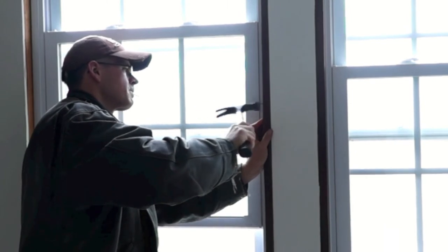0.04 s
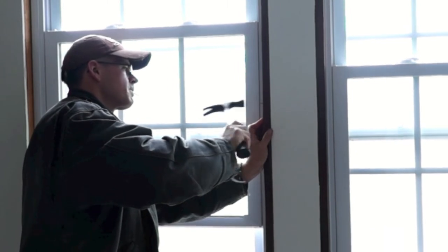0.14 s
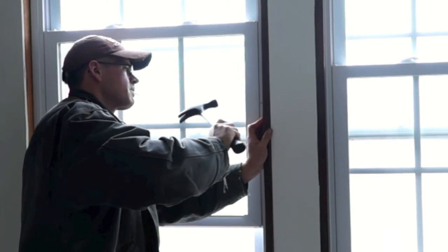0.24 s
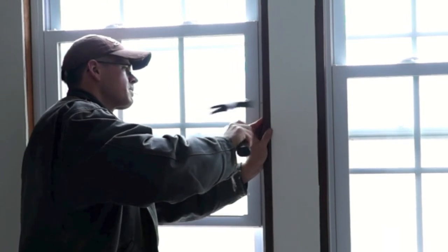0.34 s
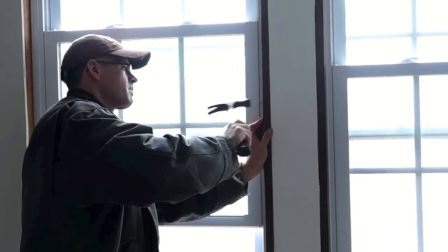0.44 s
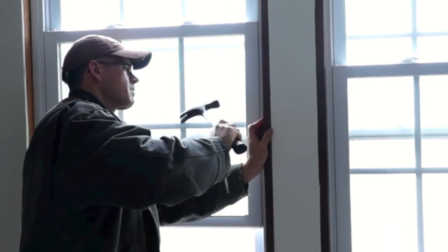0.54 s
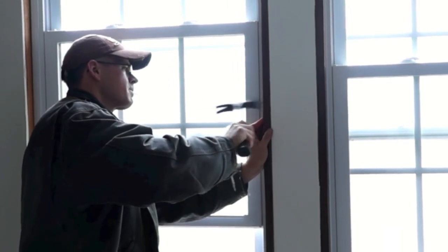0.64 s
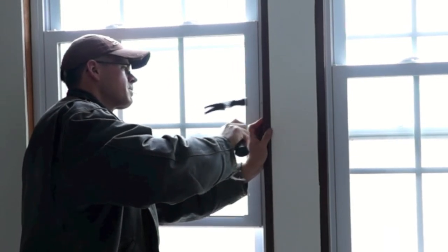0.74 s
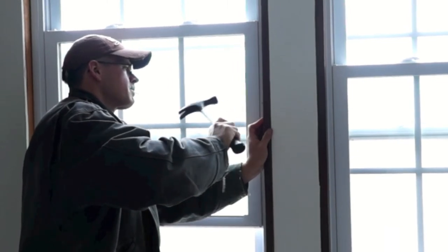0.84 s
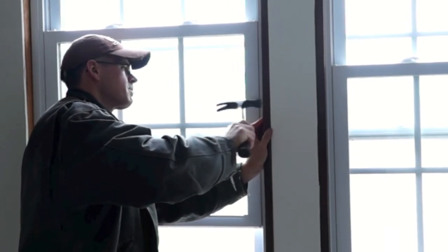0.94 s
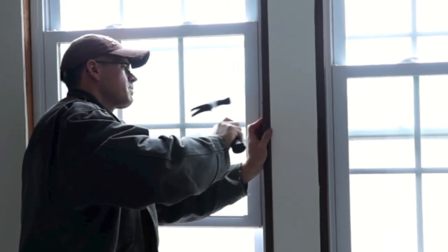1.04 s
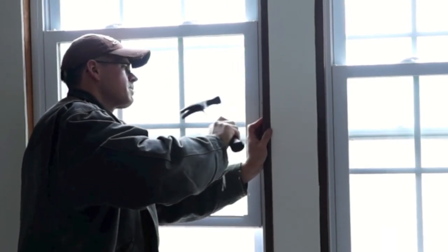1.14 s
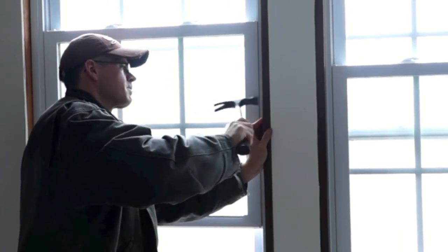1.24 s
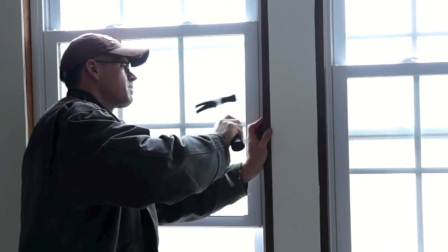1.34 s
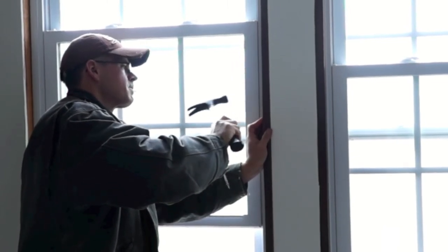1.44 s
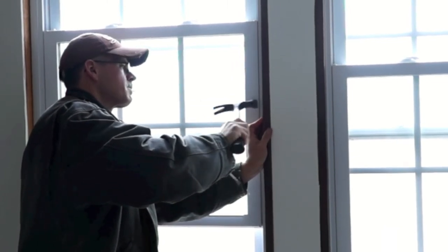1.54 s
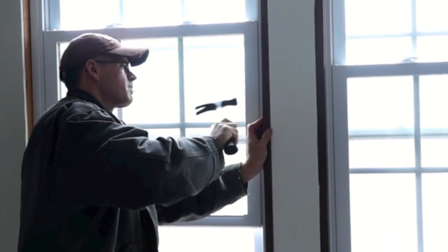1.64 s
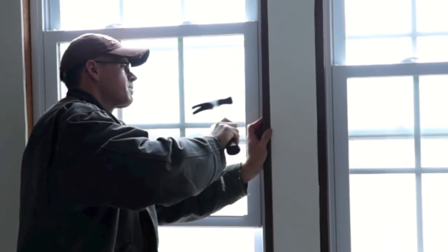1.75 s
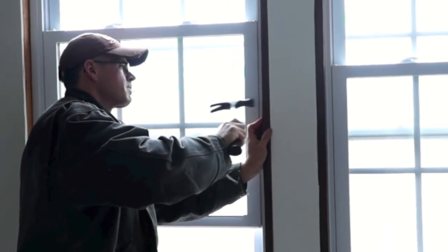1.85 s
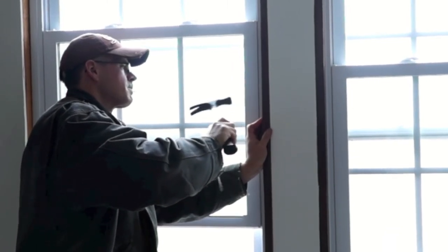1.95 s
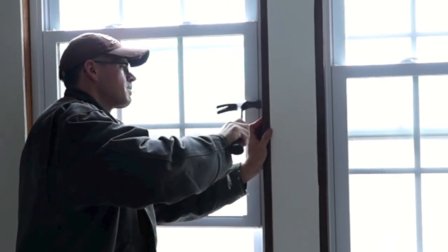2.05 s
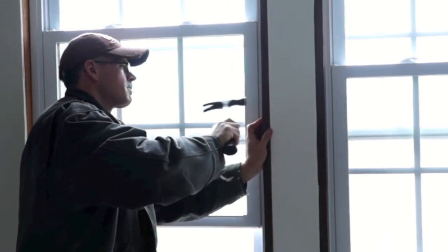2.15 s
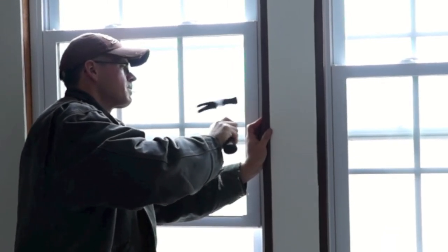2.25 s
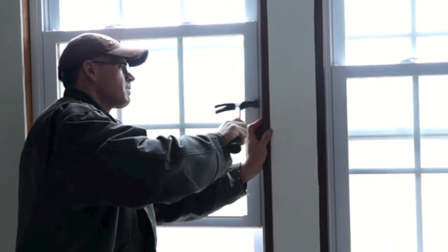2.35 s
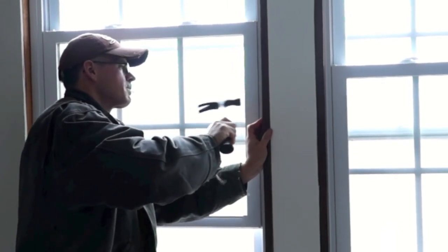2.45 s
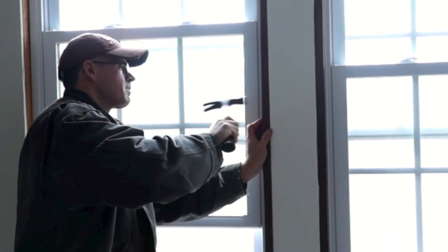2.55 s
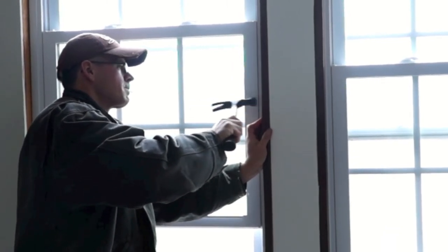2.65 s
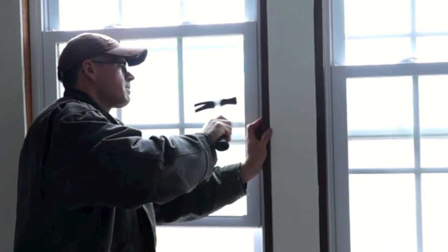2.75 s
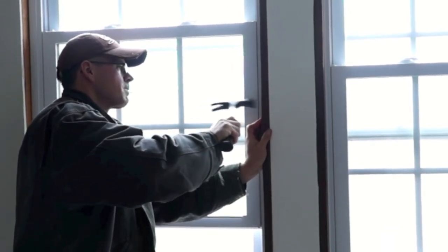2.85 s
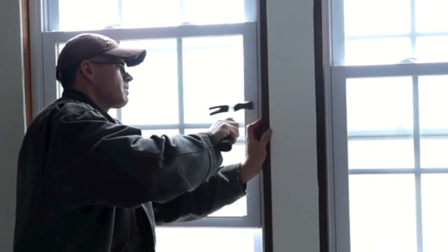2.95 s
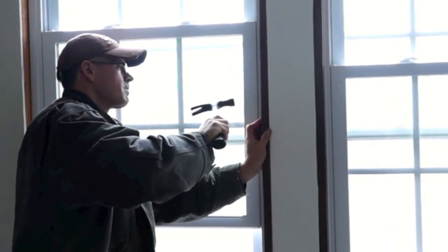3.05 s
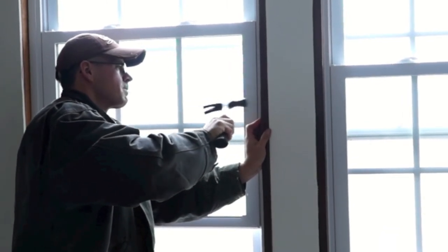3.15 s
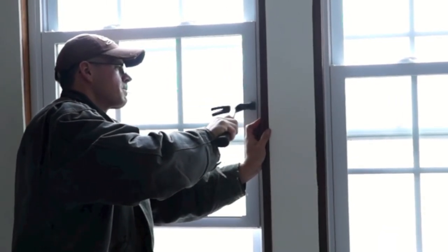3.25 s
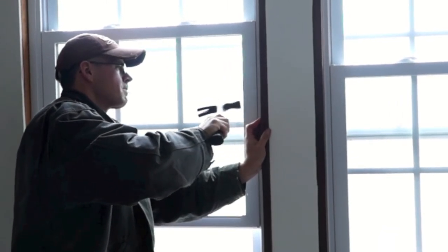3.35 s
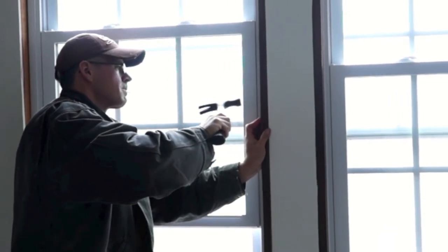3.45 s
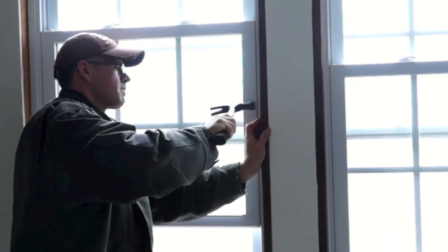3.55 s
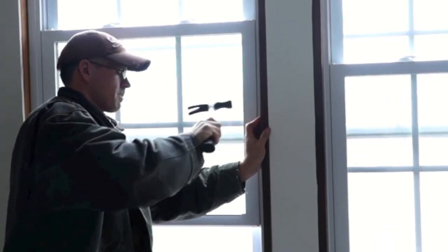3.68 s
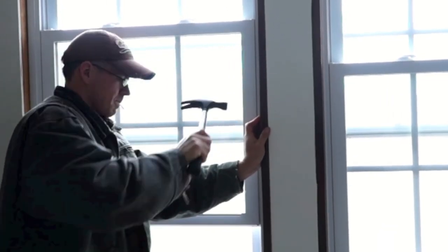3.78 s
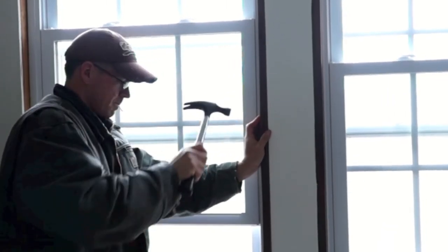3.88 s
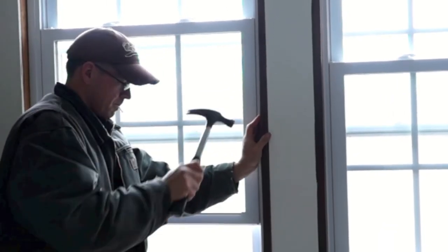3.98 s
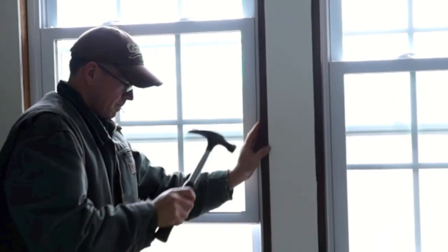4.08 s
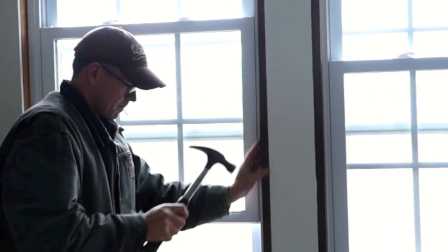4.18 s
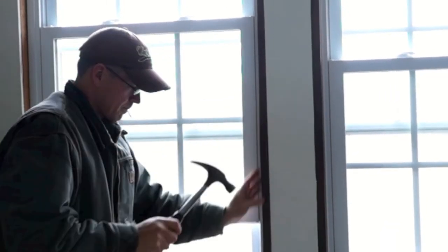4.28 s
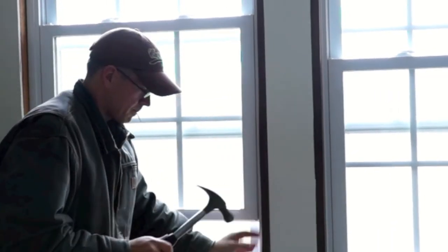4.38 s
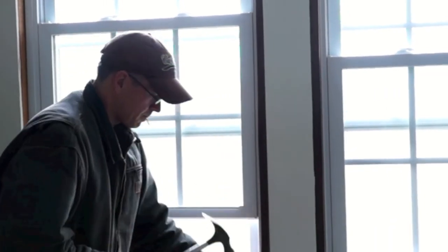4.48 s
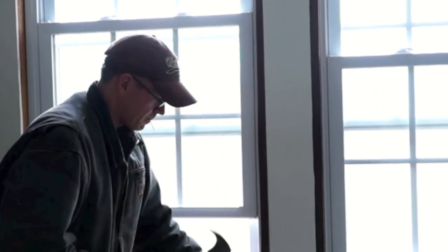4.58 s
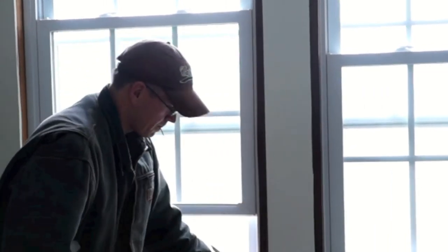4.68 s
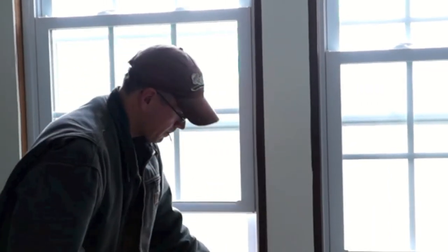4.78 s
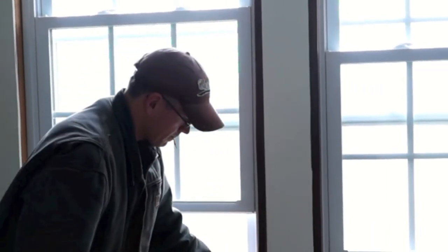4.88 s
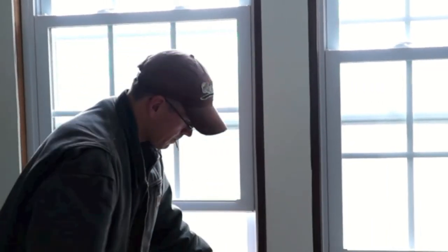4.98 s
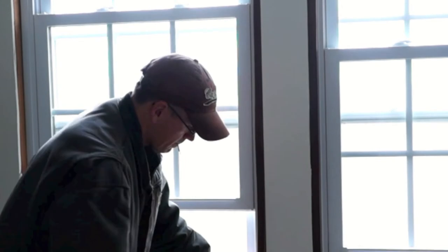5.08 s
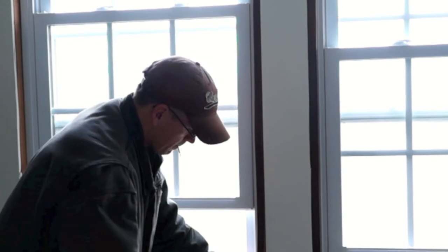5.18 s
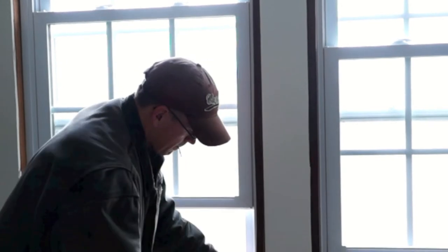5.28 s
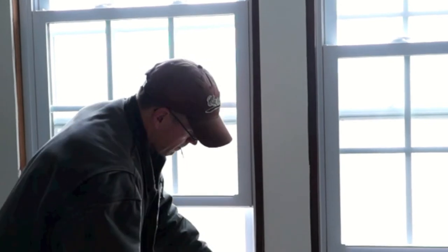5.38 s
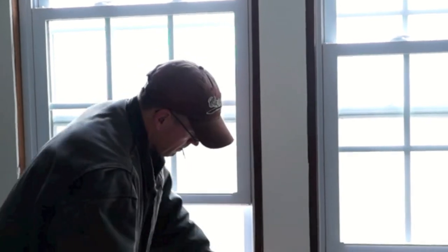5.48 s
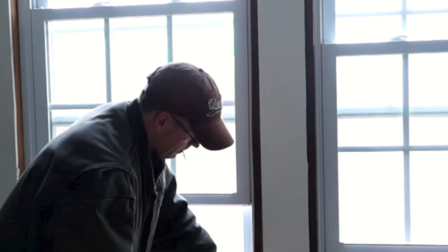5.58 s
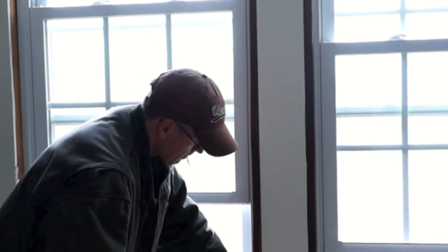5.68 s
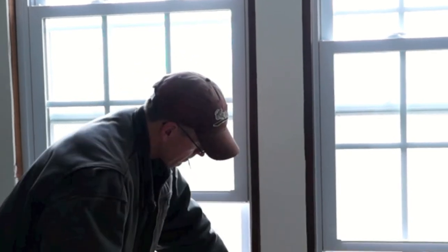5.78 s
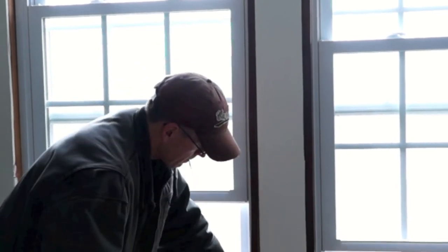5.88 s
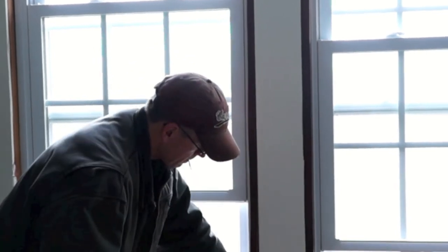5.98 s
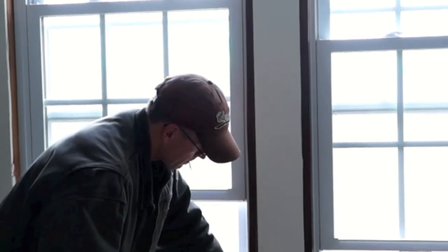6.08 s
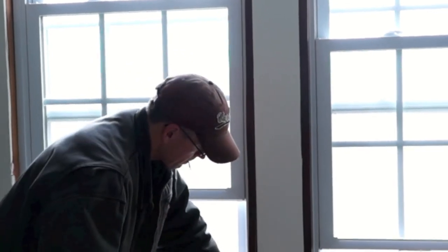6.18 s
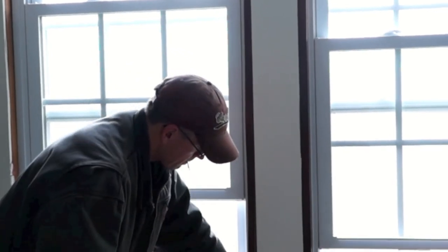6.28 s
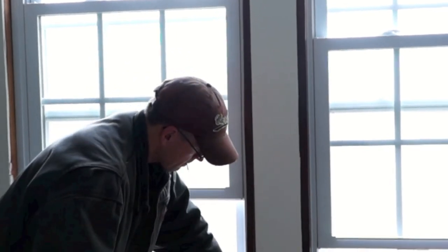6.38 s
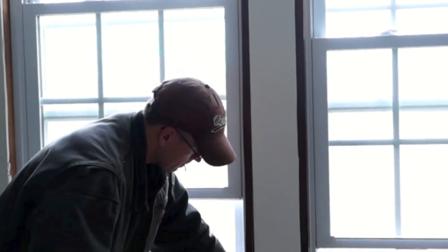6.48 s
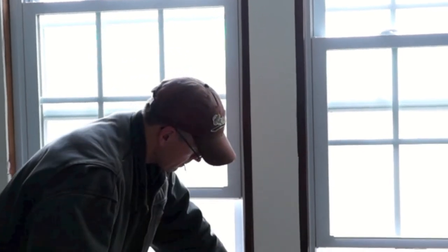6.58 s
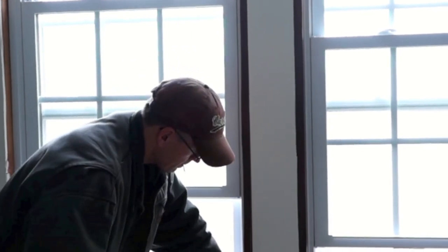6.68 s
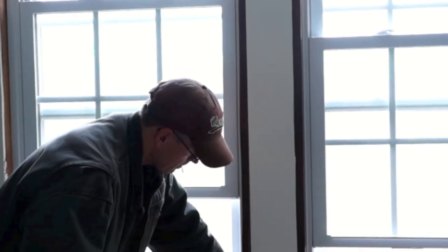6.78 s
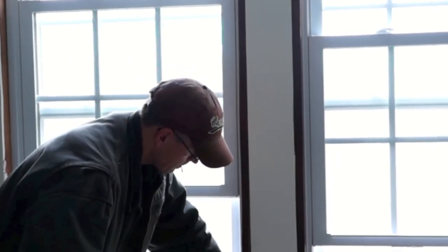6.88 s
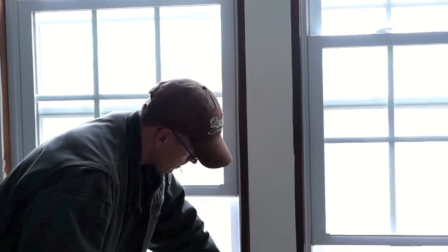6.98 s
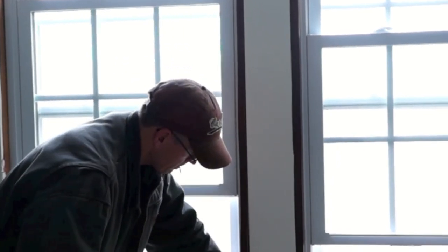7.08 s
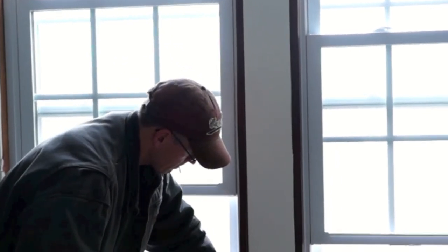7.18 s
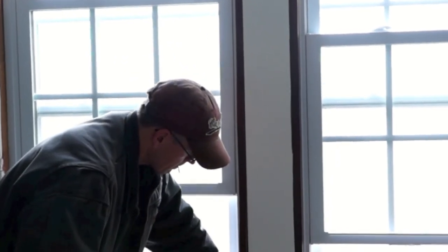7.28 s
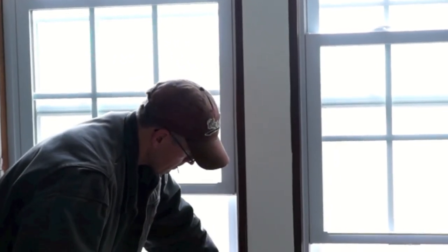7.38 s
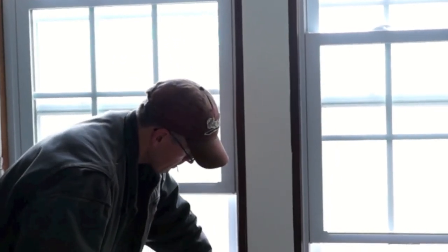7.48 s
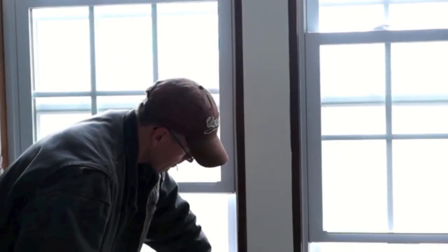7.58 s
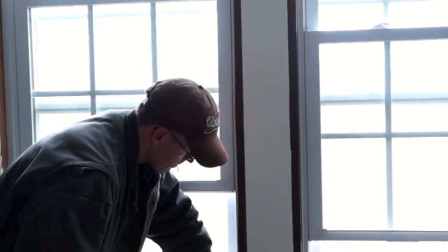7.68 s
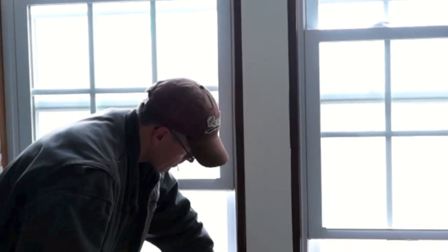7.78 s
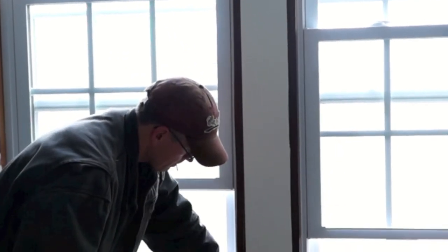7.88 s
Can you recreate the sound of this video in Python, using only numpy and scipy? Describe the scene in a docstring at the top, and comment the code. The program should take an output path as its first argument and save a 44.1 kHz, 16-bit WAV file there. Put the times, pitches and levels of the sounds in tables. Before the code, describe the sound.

Steel strikes a nail in wooden trim at a steady pace, three or four blows a second, climbing in pitch and then dulling as the hammer meets wood. The hammering stops, the handle knocks softly and heavy cloth rustles faintly. Eight gentler taps then shake the wall with low thuds while a loose board clacks back. Everything is heard from nearby in a quiet, bare room with a brief echo.

```python
"""A bare room, where a man drives a nail into wooden window trim with a steady run of hammer blows.
The nail's note climbs as it sinks, the hollow wall booms, and the last blows land on the wood itself.
He shifts his grip, bends down with a rustle of his jacket and softly taps the lower trim into place;
the loose board clacks back. Each knock is a short burst of noise plus the room's echo, shaped by the
tones the wood favours. A faint hush lies under it all."""
import sys
import numpy as np
from scipy import signal
from scipy.fft import rfft, irfft
from scipy.io import wavfile
from scipy.ndimage import uniform_filter1d

SR = 44100
rng = np.random.default_rng(int(sys.argv[2]) if len(sys.argv) > 2 else 0)


def generate_wav(signal):
    """Clip the signal to [-1, 1] and save it as 16-bit WAV at the path in sys.argv[1]."""
    frames = np.transpose(np.atleast_2d(signal))
    scaled = np.clip(frames, -1, 1) * 32767
    pcm = np.round(scaled).astype(np.int16)
    wavfile.write(sys.argv[1], SR, pcm)


N = 349713
SIZE = 24576  # samples in one knock and its echo
HZ, AGE = np.fft.rfftfreq(SIZE, 1 / SR), np.arange(SIZE) / SR  # its frequencies, its time in seconds

# How long the room echoes. Each row: frequency in Hz, base time in seconds to fade by 60 dB.
ROOM_FADE = [(60, 0.71), (200, 0.38), (500, 0.3), (1000, 0.37), (2000, 0.28), (5000, 0.26), (9000, 0.26),
             (16000, 0.16)]
# Tones the lower trim favours. Each row: frequency in Hz, width in octaves, boost in dB.
LOWER_BOARD = [(550, 0.063, 7), (1394, 0.04, 4.5), (1650, 0.018, 7), (2350, 0.03, 2.5), (4800, 0.04, 4)]


def hammer(steel_hz=16500, change_hz=7000, push_db=-3.5):
    """Blows shake nail, board and wall; the harder the contact, the more the wall booms."""
    # Each row: start in seconds, force in dB, treble limit in Hz (high on steel, low on wood).
    blows = [(-0.2, -7.5, 16000), (0.0932, -5, 16500), (0.4015, -5, 18200), (0.684, -5, 17400),
             (0.9683, -5, 16200), (1.2574, -5, 14000), (1.5452, -5.5, 13100), (1.823, -5.5, 13000),
             (2.0849, -5.5, 13000), (2.3528, -6, 13100), (2.6373, -5, 11700), (2.911, -5, 6570),
             (3.2462, -6, 2930), (3.5322, -5.5, 9300)]
    # The tone of a blow on the trim. Each row: frequency in Hz, level in dB.
    trim_tone = [(30, -8.5), (55, 18), (78, 28), (140, 22.5), (270, 32.5), (450, 30), (850, 25),
                 (1200, 17.5), (1850, 20.5), (2600, 13), (3900, 7.5), (5500, 13), (8500, 13.5),
                 (12000, 6.5), (16000, 0)]
    # Tones the nailed board favours. Each row: frequency in Hz, width in octaves, gain in dB.
    board = [(471, 0.026, 2.5), (534, 0.11, 0), (642, 0.068, 2.5), (890, 0.1, 1.5), (1050, 0.03, -0.5),
             (1307, 0.02, 6), (1730, 0.035, 2), (2470, 0.068, 3), (3490, 0.025, 2), (6550, 0.16, -3)]
    trim_db = read(trim_tone, HZ) + resonances(board)
    # the hammer never lands twice on quite the same spot, which changes the treble most
    fresh_share = np.clip(0.082 + 1.4 * HZ / (HZ + change_hz), .01, .99)
    boom, out = wall_boom(), np.zeros((2, N))
    steady = coloured(impact(), trim_db + 10 * np.log10(1 - fresh_share)) + woodwork_ring()
    push = coloured(board_push(), trim_db + push_db)
    for s, force_db, top_hz in blows:
        fresh = coloured(impact(), trim_db + 10 * np.log10(fresh_share))
        softness = np.log2(steel_hz / top_hz)
        boom_db = -0.93 - 3 * softness
        wall_db = 0.87 * boom_db * bell(HZ, 180, 1.0)
        # a softer contact puts its force into the middle tones
        contact_db = np.maximum(soft_contact(top_hz), -19) + 0.32 * softness * bell(HZ, 1116, 1.2)
        blow = coloured(steady + fresh + push, nail_colour(s) + wall_db + contact_db)
        add(out, s, amp(force_db) * (blow + amp(boom_db) * boom))
    return leaning(out)


def impact(click_db=-9, crack_db=-8):
    """The click of steel on the nail, the crack of the wood round it, then the room."""
    click = amp(click_db) * crack(decay_s=0.0004, low_hz=2310)
    wood = amp(crack_db) * crack(decay_s=0.0037, low_hz=420)
    return click + wood + room()


def nail_colour(s, free_hz=677, sunk_hz=1254, ping_hz=3450, ping_life_s=0.17):
    """The nail's note climbs and weakens as it sinks: dB over HZ for a blow at time s."""
    # The nail holds, then sinks. Each row: time in seconds, depth from 0 (free) to 1 (fully in).
    sinking = [(0.7, 0), (1.25, 0.13), (1.55, 0.42), (2.35, 0.57), (3.2, 1)]
    depth = np.interp(s, *np.transpose(sinking))
    note_hz = free_hz * (sunk_hz / free_hz) ** depth
    # the nail passes its own note and absorbs the band below it
    note = 1.3 * bell(HZ, note_hz, 0.13) - 1.35 * bell(HZ, 0.618 * note_hz, 0.13)
    # the loose nail pings until the wood grips it
    ping_db = 8 * np.exp(-max(s, 0) / ping_life_s) * bell(HZ, ping_hz, 0.28)
    # the deeper the nail, the more the wood knocks and snaps
    knock_db = np.interp(depth, [0, 1], [-6, 1.5]) * bell(HZ, 520, 0.69)
    snap_db = np.interp(depth, [0, 1], [0.87, 1.6]) * bell(HZ, 3500, 0.91)
    return np.interp(depth, [0, 1], [6, 2]) * note + ping_db + knock_db + snap_db


def board_push(delay_s=.0013):
    """Just after the steel clicks, the whole board gives way in one push."""
    pulse = coloured(-signal.unit_impulse(SIZE, round(delay_s * SR)), soft_contact(3200))
    return signal.lfilter(*signal.butter(2, 560, "high", fs=SR), pulse)


def woodwork_ring(rise_cycles=2.7, apart_radians=0.34, life=0.92):
    """Trim, window and wall ring with tones that build up, slightly out of step left and right."""
    # Each row: frequency in Hz, level in dB, base time in seconds to fade by 60 dB.
    tones = [(178, -32, .4), (207, -31, .35), (231, -29, .45), (283, -24, .33), (298, -26, .3),
             (326, -27, .3), (374, -28, .3), (451, -27, .33), (520, -28, .3), (543, -27, .35),
             (630, -26, .35), (661, -28, .35), (694, -29, .5), (768, -28, .3), (811, -26, .35),
             (850, -28, .3), (879, -26, .3), (939, -28, .3), (1005, -25, .3), (1345, -29, .25),
             (1673, -26, .23), (1728, -30, .22), (1936, -27, .22), (2213, -31, .18), (2342, -32, .2),
             (2546, -32, .2), (3020, -35, .16), (3440, -34, .12), (3494, -37, .22)]
    hz, db, fade_s = np.transpose(tones)[:, :, None]
    phase = 2 * np.pi * rng.random((len(tones), 1))
    skew = apart_radians * rng.choice([-.5, .5], (len(tones), 1))
    level = amp(db - 60 * AGE / (life * fade_s)) * (1 - np.exp(-AGE * hz / rise_cycles))
    angle = 2 * np.pi * hz * AGE + phase
    return np.array([(level * np.sin(angle + side * skew)).sum(0) for side in (-1, 1)])


def wall_boom(hz=94, db=-22.5, peak_s=0.069, swell=7.5, linger_db=-9):
    """The hollow wall swells into a low note that lingers in the room, louder on the right."""
    progress = AGE / peak_s
    linger = np.minimum(progress, 1) ** 2 * amp(-60 * (AGE - peak_s) / read(ROOM_FADE, hz))
    level = (progress * np.exp(1 - progress)) ** swell + amp(linger_db) * linger
    return amp(db) * level * np.sin(2 * np.pi * hz * AGE) * amp([[-2.8], [-.8]])


def taps(direct_db=-9, rumble_db=6, rumble_top_hz=76):
    """Soft knocks on the lower trim shake the wall; the board hums and the floor rumbles on."""
    # Each row: start in seconds, force in dB, extra deep thud in dB.
    knocks = [(5.792, -3, 2), (6.044, -3.5, 3), (6.322, -6.5, 9.5), (6.572, -6.5, 7.5), (6.818, -5.5, 7),
              (7.064, 0.5, 4.5), (7.329, -2, 8), (7.899, 4.5, 7.5)]
    # The tone of a tap. Each row: frequency in Hz, level in dB.
    tap_tone = [(25, 10), (45, 20), (110, 8), (170, 9), (280, 10), (400, -3), (900, -5.5), (1800, -12),
                (4000, -19.5), (16000, -1.5)]
    out, fade = np.zeros((2, N)), signal.windows.tukey(SIZE, .05)
    tap_db = read(tap_tone, HZ) + resonances(LOWER_BOARD)
    boom = wall_boom(hz=110.8, db=-37.5, peak_s=0.036, swell=3.6, linger_db=-19)
    for s, db, thud_db in knocks:
        add(out, s, amp(db + thud_db / 2) * boom)
        top_hz = 3050 * 2 ** (db / 23)  # a firmer tap is brighter
        knock = room(life=0.59) + amp(direct_db) * crack(decay_s=0.0038, low_hz=292)
        add(out, s, coloured(knock, db + tap_db + soft_contact(top_hz) + thud_db * bell(HZ, 42, 1.4)))
        rumble = coloured(room(life=2.0), db + thud_db + rumble_db + soft_contact(rumble_top_hz))
        add(out, s, fade * rumble)
    return out


def clacks():
    """The loose board clacks against the frame, wood on wood."""
    # Each row: start in seconds, level in dB.
    hits = [(5.7919, -6), (6.366, -7), (6.602, -15), (6.8449, -11.5), (7.0665, -9), (7.0864, -8),
            (7.3524, -9), (7.898, -13), (7.9225, -8)]
    # The tone of a clack. Each row: frequency in Hz, level in dB.
    clack_tone = [(100, -9), (550, 0.5), (1000, -1.5), (1500, -5.5), (2000, -4), (3000, -13.5),
                  (5000, -15.5), (8000, -12), (12000, -23.5), (16000, -31)]
    out = np.zeros((2, N))
    for s, db in hits:
        click = 0.83 * crack(decay_s=0.00076, low_hz=590) + 0.87 * room()
        add(out, s, coloured(click, db + read(clack_tone, HZ) + resonances(LOWER_BOARD)))
    return out


def handle_bumps():
    """Hand and handle knock dully as he shifts his grip and lowers the hammer."""
    # Each row: start in seconds, level in dB, centre frequency in Hz.
    knocks = [(3.885, -14, 516), (4.066, -21, 1100), (4.195, -17.5, 800), (4.326, -11.5, 726),
              (4.457, -18.5, 883), (4.462, -10, 253), (4.63, -22, 1096)]
    out = np.zeros((2, N))
    for s, db, hz in knocks:
        knock = room(life=0.35) + .5 * crack(decay_s=0.0029, low_hz=198)
        add(out, s, coloured(knock, db + 20 * np.log10(bell(HZ, hz, 0.5) + 0.017)))
    return out


def scuffs(grain_db=4.0, octaves=0.72):
    """Sleeve and wood rub in brief grainy swells, heard through the room's echo."""
    # Each row: rough time of the peak in seconds, level in dB, half length in seconds, centre in Hz.
    rubs = [(3.899, -70, 0.032, 5500), (4.319, -61, 0.04, 895), (4.325, -68, 0.079, 8000),
            (5.31, -60, 0.017, 1950), (6.66, -68.5, 0.16, 5730), (7.169, -50.5, 0.01, 720),
            (7.153, -54, 0.014, 4430), (7.429, -52, 0.0052, 4660), (7.434, -47.5, 0.0082, 610)]
    out, middle = np.zeros((2, N)), AGE[SIZE // 2]
    for s, db, half_s, hz in rubs:
        grains = rng.standard_normal(SIZE) * amp(grain_db * rng.exponential(1, SIZE))
        rub = coloured(grains, 20 * np.log10(bell(HZ, hz, octaves) + .01))
        swell = amp(db) * np.exp(-.5 * ((AGE - middle) / half_s) ** 2)
        add(out, s - middle - .015, signal.fftconvolve(swell * rub / rub.std(), room(), axes=1))
    return out


def jacket(folds_db=2.0):
    """Heavy cloth slides over itself as he stoops, catching fold by fold."""
    # How loud the rubbing is. Each row: time in seconds, level in dB.
    stoop = [(3.7, -76.5), (4.2, -70), (4.6, -82), (4.9, -74.5), (5.15, -64.5), (5.32, -61.5), (5.42, -70),
             (7.9, -68)]
    # The tone of the cloth. Each row: frequency in Hz, relative level in dB.
    cloth_tone = [(100, -23), (300, -10), (1100, -10), (2200, -13), (3800, -19.5), (7000, -15),
                  (10000, -16.5), (16000, -24)]
    t = np.arange(N) / SR
    fold_times = np.linspace(0, t[-1], num=240)
    folds = np.interp(t, fold_times, rng.standard_normal(len(fold_times)))
    return hiss(cloth_tone) * amp(np.interp(t, *np.transpose(stoop)) + folds_db * folds)


def room(life=0.84):
    """Echoes off the bare walls build up and die away band by band; life scales how long they last."""
    # Each row: frequency in Hz, seconds the echo takes to build up.
    build_up = [(60, 0.0034), (180, 0.009), (400, 0.014), (1000, 0.005), (8000, 0.00083)]
    hz, t, noise = signal.stft(rng.standard_normal((2, SIZE)), SR, nperseg=256)
    rise = (1 - np.exp(-t / read(build_up, hz)[:, None])) ** 2
    fall = amp(-60 * t / (life * read(ROOM_FADE, hz)[:, None]))
    tails = signal.istft(noise * rise * fall, SR, nperseg=256)[1][:, :SIZE]
    return spread(*[levelled(tail, span_hz=37.06) for tail in tails])


def air(db=-65.5):
    """The steady hush of the still room."""
    # Each row: frequency in Hz, relative level in dB.
    air_tone = [(25, 6), (50, -1.5), (110, 3), (180, 1), (280, 5.5), (400, -1.5), (700, -3.5), (1500, -8),
                (2400, -11.5), (6000, -13.5), (11000, -12.5), (16000, -20)]
    return amp(db) * hiss(air_tone)


def crack(decay_s, low_hz):
    """The sound straight from a knock: a very short burst of noise with little bass."""
    bursts = rng.standard_normal((2, SIZE)) * np.exp(-AGE / decay_s)
    direct = spread(*[levelled(burst, span_hz=524) for burst in bursts])
    return signal.lfilter(*signal.butter(2, low_hz, "high", fs=SR), direct)


def hiss(tone):
    """Wide stereo noise with the given tone; its middle signal has level 1."""
    # Stereo width. Each row: frequency in Hz, side level over middle level in dB.
    width = [(60, -19), (300, -1), (1000, 5), (4000, -0.5), (15000, -2.5)]
    hz = np.fft.rfftfreq(N, 1 / SR)
    spectra = rfft(rng.standard_normal((2, N))) * amp(read(tone, hz))
    mid, side = irfft(spectra[0], N), irfft(spectra[1] * amp(read(width, hz)), N)
    return np.array([mid + side, mid - side]) / mid.std()


def spread(mid, side):
    """Makes stereo: bass arrives alike on the left and right, treble less so."""
    # Each row: frequency in Hz, side level over middle level in dB.
    width = [(60, -12), (200, -10), (400, -6), (1300, -7), (2400, -6), (4400, -4), (15000, -2)]
    side = coloured(side, read(width, HZ))[0]
    return np.array([mid + side, mid - side])


def leaning(x):
    """Bass leans to the right, the upper middle tones to the left."""
    # Each row: frequency in Hz, left level over right level in dB.
    balance = [(94, -1), (170, -2), (280, -2.5), (700, -0.5), (2500, 1.5), (5500, -1), (15000, 1)]
    db = read(balance, np.fft.rfftfreq(N, 1 / SR))
    return irfft(rfft(x) * amp([db / 2, -db / 2]), N)


def soft_contact(top_hz):
    """A longer contact takes away the treble: dB over HZ."""
    return -10 * np.log10(1 + (HZ / top_hz) ** 4)


def resonances(table):
    """The tones a board favours, added up: dB over HZ."""
    return sum(db * bell(HZ, hz, octaves) for hz, octaves, db in table)


def bell(hz, centre_hz, octaves):
    """A bell-shaped curve of height 1 around a frequency."""
    return np.exp(-.5 * (np.log2((hz + 1) / centre_hz) / octaves) ** 2)


def coloured(x, db):
    """Filters a sound of SIZE samples by a gain in dB for each frequency in HZ."""
    cepstrum = irfft(np.log(amp(np.maximum(db, -100))))
    # folding this onto its first half makes the filter ring after a hit, not before
    cepstrum[1:SIZE // 2] *= 2
    cepstrum[SIZE // 2 + 1:] = 0
    return irfft(rfft(np.atleast_2d(x)) * np.exp(rfft(cepstrum)))


def levelled(x, span_hz):
    """Makes a noisy burst about equally strong at all frequencies."""
    power = uniform_filter1d(abs(rfft(x)) ** 2, max(int(span_hz / HZ[1]), 1))
    return coloured(x, -10 * np.log10(abs(power) + 1e-12))[0]


def read(points, hz):
    """Looks up hz in a table, joining its rows by straight lines on an octave scale."""
    row_hz, value = np.transpose(points)
    return np.interp(np.log(hz + 1), np.log(row_hz + 1), value)


def amp(db):
    """Decibels to gain."""
    return 10 ** (np.asarray(db) / 20)


def add(mix, s, sound):
    """Lays a stereo sound into the mix at s seconds."""
    start = round(s * SR)
    sound = sound[:, max(-start, 0):]
    part = mix[:, max(start, 0):][:, :sound.shape[1]]
    part += sound[:, :part.shape[1]]


def scene():
    """All the work at the window, over the still room."""
    return hammer() + taps() + clacks() + handle_bumps() + scuffs() + jacket() + air()


def record(dry, limit_db=-24, squeeze=0.096, attack_s=0.00089, recover_db_per_s=230, top_hz=16200):
    """Turns loud knocks down a little just after their first crack, then cuts the highest treble."""
    power_db = 10 * np.log10(abs(uniform_filter1d((dry ** 2).mean(0), size=120)) + 1e-12)
    fall_db = np.arange(N) * recover_db_per_s / SR
    held_db = np.maximum.accumulate(power_db + fall_db) - fall_db
    over_db = np.maximum(held_db - limit_db, 0)
    lag = np.exp(-1 / (attack_s * SR))
    limited = dry / amp(squeeze * signal.lfilter([1 - lag], [1, -lag], over_db))
    treble_cut = signal.firwin(255, top_hz, window=("kaiser", 9), fs=SR)
    return signal.oaconvolve(limited, treble_cut[None], "same")


dry = scene()
out = record(dry)
generate_wav(out)
```